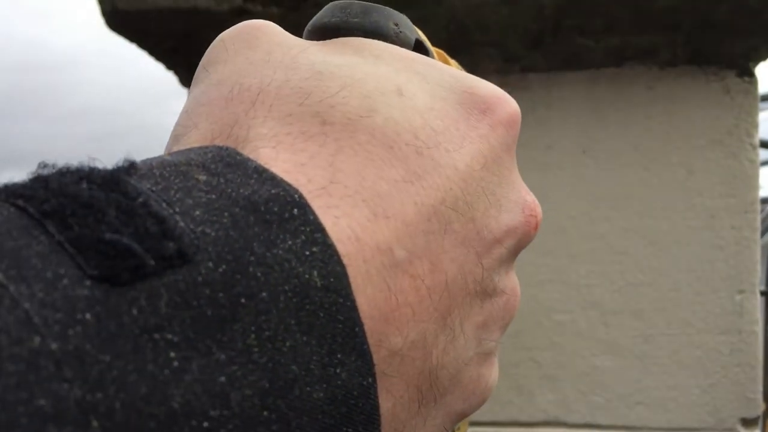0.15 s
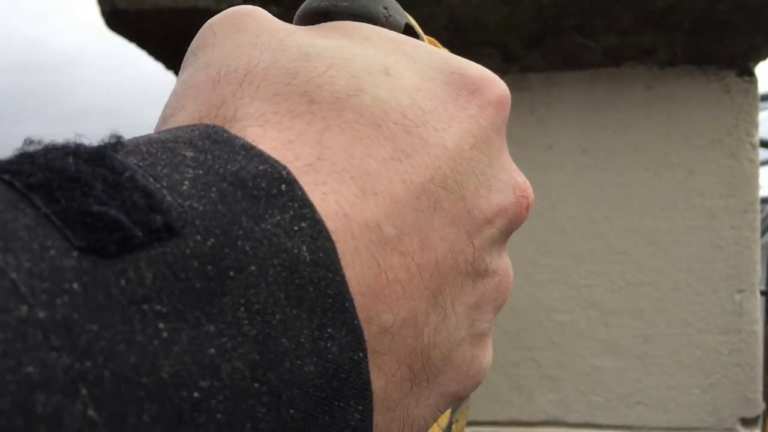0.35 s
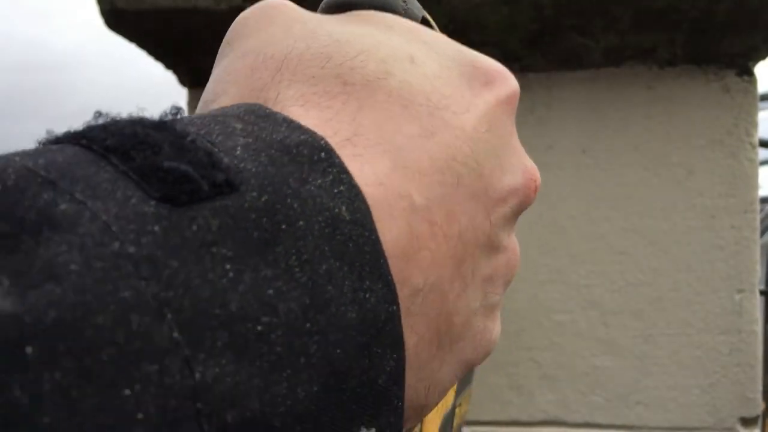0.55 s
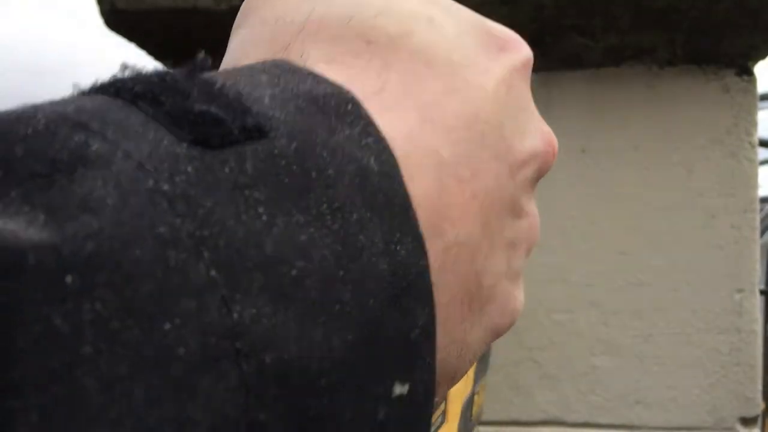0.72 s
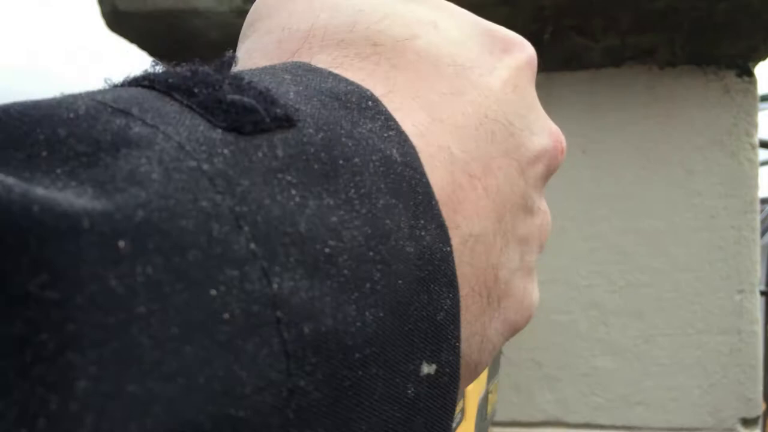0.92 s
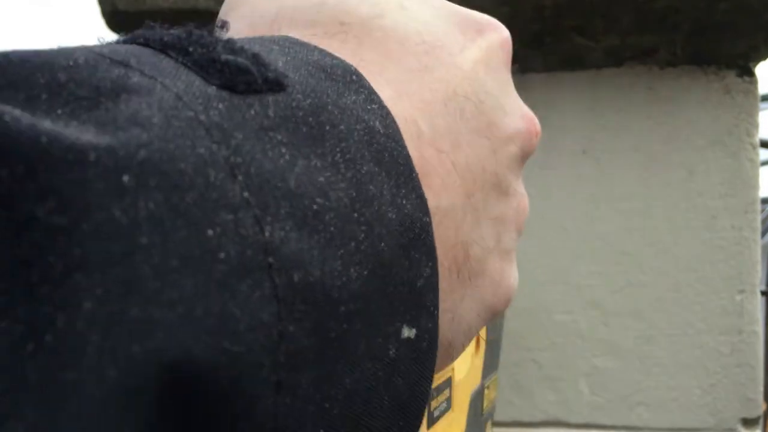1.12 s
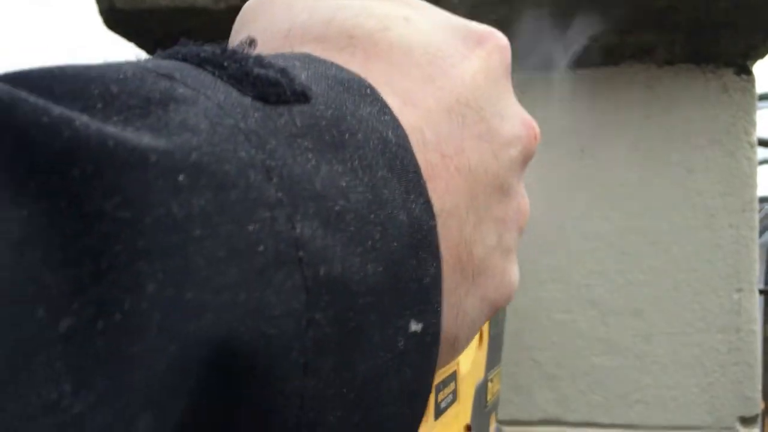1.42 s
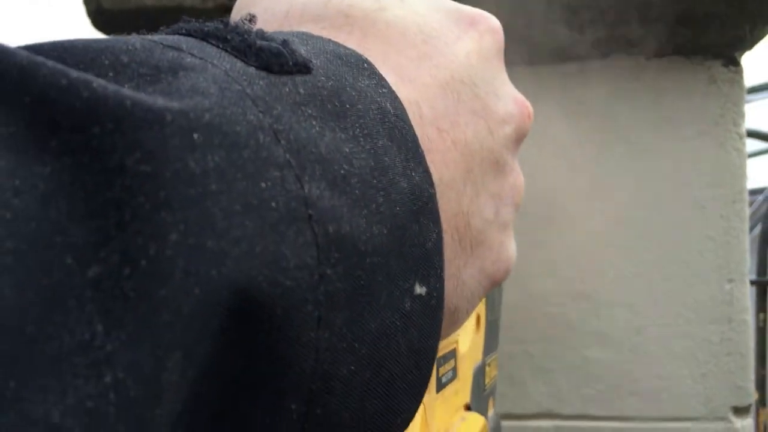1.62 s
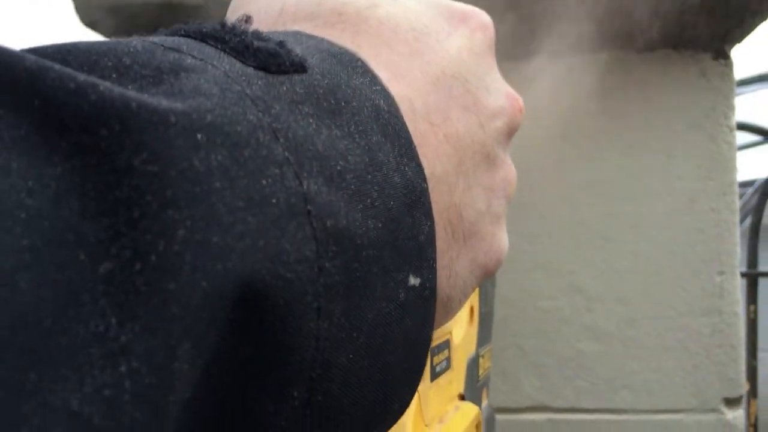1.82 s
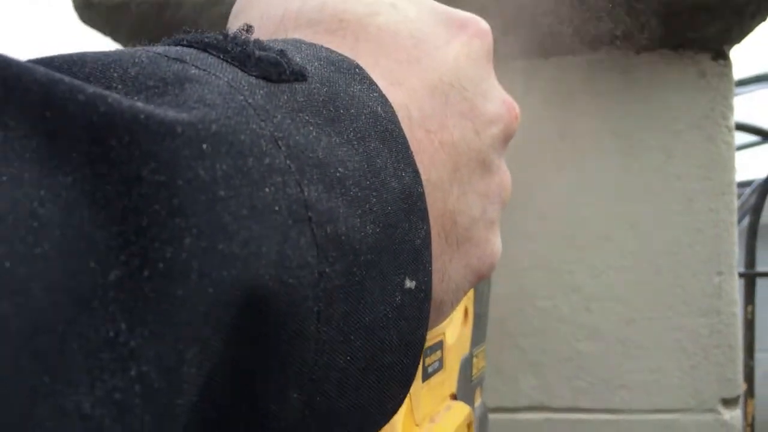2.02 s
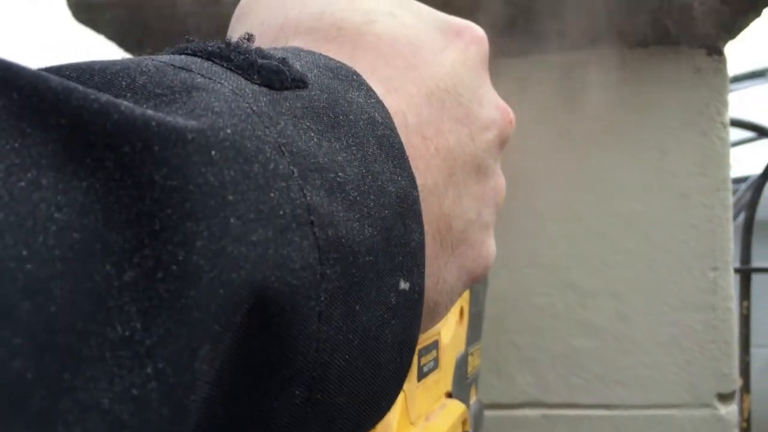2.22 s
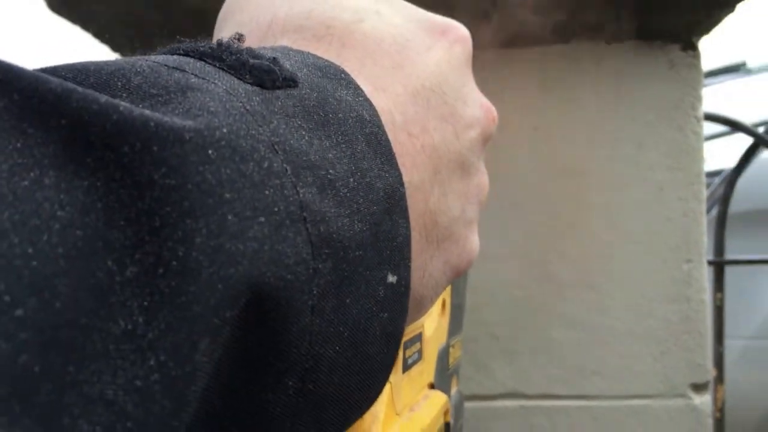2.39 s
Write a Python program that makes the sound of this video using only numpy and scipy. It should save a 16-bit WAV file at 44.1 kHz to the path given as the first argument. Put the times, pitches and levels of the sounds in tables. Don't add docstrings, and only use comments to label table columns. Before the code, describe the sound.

After half a second of faint hum and low wind, a hammer drill spins up and brakes in four brief blips, then drills masonry steadily with a rapid metallic rattle, close and dry outdoors.

```python
import sys
import numpy as np
from scipy import signal
from scipy.fft import rfft, irfft, next_fast_len
from scipy.io import wavfile

SR = 44100
rng = np.random.default_rng(int(sys.argv[2]) if len(sys.argv) > 2 else 0)


def elevation(decibels):
    levels = np.asarray(decibels, float)
    return 10 ** (levels / 20)


def store_wav(level_fs):
    pcm = np.round(np.clip(np.atleast_2d(level_fs), -1, 1) * 32767)
    wavfile.write(sys.argv[1], SR, pcm.T.astype(np.int16))


N = 112454
T = np.arange(N) / SR


def rms_one(x):
    return x / np.sqrt(np.mean(x ** 2) + 1e-20)


def drift(rate_hz):
    r = np.exp(-80 * np.pi * rate_hz / SR)
    slow = signal.lfilter([1], [1, -2 * r, r * r], rng.standard_normal(N // 40 + 1002))[1000:]
    return np.interp(np.arange(N) / 40, np.arange(len(slow)), rms_one(slow))


def coloured(points, patchy_db=0.):
    hz, db = np.transpose(points)
    size = next_fast_len(N)
    f = np.maximum(np.arange(size // 2 + 1) * SR / size, 1)
    spectrum = rfft(rng.standard_normal(size)) * elevation(np.interp(np.log(f), np.log(hz), db))
    spectrum = spectrum * (f > hz[0]) * (f < hz[-1])
    out = 0
    for octave in np.arange(6, 15):
        share = np.cos(np.pi / 2 * np.clip(np.log2(f) - octave, -1, 1)) ** 2
        out = out + irfft(spectrum * share, size)[:N] * elevation(patchy_db * drift(37))
    return rms_one(out)


def resonate(x, hz, width_hz):
    r = np.exp(-np.pi * width_hz / SR)
    poles = [1, -2 * r * np.cos(2 * np.pi * hz / SR), r * r]
    return signal.lfilter([(1 - r * r) / 2, 0, (r * r - 1) / 2], poles, x + 1e-18)


def clicks(s, size):
    at, out = np.clip(s * SR, 0, N - 2), np.zeros(N)
    k = at.astype(int)
    np.add.at(out, k, size * (1 - at + k))
    np.add.at(out, k + 1, size * (at - k))
    return out


def wind():
    # time in seconds, level in dB.
    gust_levels = [(0.0, -47), (0.14, -54), (0.18, -63), (0.82, -56), (0.96, -38), (1.01, -55.5),
                   (1.07, -51.5), (1.17, -61.5), (1.44, -54), (1.52, -43), (1.58, -56.5), (1.92, -57),
                   (1.96, -59.5), (2.34, -51), (2.42, -51), (2.55, -55)]
    s, db = np.transpose(gust_levels)
    low_hz, top_hz = 20.4, 75.6
    low_band = signal.butter(2, [8, low_hz], "band", fs=SR, output="sos")
    top_band = signal.butter(1, [low_hz, top_hz], "band", fs=SR, output="sos")
    low = signal.sosfilt(low_band, rng.standard_normal(N + SR))[SR:]
    top = signal.sosfilt(top_band, rng.standard_normal(N + SR))[SR:]
    top = signal.sosfilt(signal.butter(3, 85, fs=SR, output="sos"), top)
    gusts = rms_one(rms_one(low) + 0.23 * rms_one(top) * elevation(4 * drift(15)))
    level_db = np.interp(T, s, np.minimum(db, -52)) + 3.0

    u, dip_s, swing_s = T - .950, .0045, .024
    dip = 1.15 * np.exp(-(u / dip_s) ** 2)
    swing = .75 * np.exp(-((u - swing_s - dip_s) / swing_s) ** 2)
    return elevation(level_db) * gusts + elevation(-31) * (swing - dip)


def distant_hum():
    # frequency in Hz, level in dB per Hz.
    hum_colour = [(100, -8.5), (200, -14), (780, -25), (1500, -30), (2500, -37.5), (16500, -53)]
    level_db = -84.5 + 3.5 * np.exp(-T / 0.17)
    return elevation(level_db) * coloured(hum_colour, patchy_db=1.5)


def trigger():
    # time in seconds, peak in dB, damping (added to the peak) in dB.
    ticks = [(0.5432, -58.5, -18), (0.5588, -55, -12), (0.5927, -53, -11), (0.731, -63, -5.5),
             (0.7535, -52, -5), (0.8757, -63, -6), (0.894, -66, -11), (1.0195, -60, -4), (1.1721, -61, -8),
             (1.1894, -65, -9)]
    s, db, trim_db = np.transpose(ticks)
    r = np.exp(-1 / (0.0015 * SR))
    gate = signal.lfilter([1], [1, -r], clicks(s, elevation(db + trim_db)))
    return gate * coloured([(1000, 3), (3500, -4), (8000, -1.5), (15500, -17)])


def motor():
    # motor start in seconds, a clear blow in seconds,
    # spin-up before that blow in seconds, letting go in seconds.
    pulls = [
        (.588, .6085, .033, .636),
        (.750, .7715, .029, .809),
        (.895, .9225, .034, .956),
        (1.049, 1.0865, .050, 1.105),
        (1.189, 1.2135, .0285, 9),
    ]
    pull_trim_db = [1.4, 0.2, 0.28, 0.5, 0.25]
    # time in seconds, blow rate in Hz, effort in dB.
    full_speed = [(1.274, 155.0, -45), (1.288, 152.4, -45), (1.414, 151.9, -46), (1.426, 150.4, -45),
                  (1.486, 153.8, -46), (2.086, 153.0, -46), (2.202, 152.2, -46), (2.37, 153.6, -46),
                  (2.516, 153.5, -48), (2.55, 151.2, -47)]
    spin_up_hz_per_s, start_hz, brake_hz_per_s = 1650, 32, 600
    coast_s, coast_db_per_s, stop_db_per_s = 0.034, 75, 1310
    speed_power = 1.576

    s, full_hz, effort_db = np.transpose(full_speed)
    full, phase, level = np.interp(T, s, full_hz), np.zeros(N), np.full(N, -160.)
    ends = [p[0] for p in pulls[1:]] + [9]
    for (start, first, lead, off), end, trim_db in zip(pulls, ends, pull_trim_db):
        after = np.maximum(T - off, 0)
        up = np.maximum(spin_up_hz_per_s * (np.minimum(T, off) - first + lead), start_hz)
        rate = np.maximum(np.minimum(up, full) - brake_hz_per_s * after, 10)
        turns = np.cumsum(rate) / SR
        on = (T >= start) & (T < end)
        phase[on] = (turns - turns[int(first * SR)])[on]
        fade = coast_db_per_s * after + stop_db_per_s * np.maximum(after - coast_s, 0)
        level[on] = (trim_db + 20 * speed_power * np.log10(rate / full) - fade)[on]
    return phase, level + np.interp(T, s, effort_db)


def body_ring(s, back, luck, bite):
    # frequency in Hz, width in Hz, level biting in dB, level running free in dB.
    resonances = [(1400, 220, -3, -1.5), (1660, 178, 0, -14), (1885, 274, -1.5, -28), (2420, 420, -12, -45),
                  (3840, 530, -15.5, -8), (6140, 290, -11, -11), (189, 80, -40, -1.5),
                  (622, 240, -28, -9.5)]
    body = 0
    for k, (hz, width_hz, db, free_db) in enumerate(resonances):
        blows = clicks(s, elevation(1.56 * luck[:, 2 + k]))
        rebounds = clicks(back, elevation(-13) * (luck[:-1, 10 + k] - .7))
        ring = resonate(resonate(blows + rebounds, hz, width_hz), hz, 2 * width_hz)
        body = body + (-1) ** k * elevation(db * bite + free_db * (1 - bite)) * ring
    return body / np.std(body[N // 2:]) * elevation(-2)


def treble_crack(s, back, luck, bite):
    # frequency in Hz, level in dB per Hz.
    crack_colour = [(2000, -13), (3000, -2), (4000, -4), (6200, 0.5), (9000, -3), (10000, -9.5),
                    (13500, -6), (16500, -12.5)]
    bite_s, free_s = .00048, .0003
    spread_db = 2.3
    late_s = 0.00085 * np.interp(s, T, bite)
    blows = clicks(s + late_s, elevation(spread_db * luck[:, 18]))
    rebounds = clicks(back, np.interp(back, T, bite) * elevation(-13 + spread_db * luck[:-1, 19]))
    hits = blows + rebounds
    r, q = np.exp(-1 / (bite_s * SR)), np.exp(-1 / (free_s * SR))
    gate = signal.lfilter([1], [1, -2 * r, r * r], bite * hits)
    gate += signal.lfilter([bite_s / free_s], [1, -2 * q, q * q], (1 - bite) * hits)
    gate = gate / np.sqrt(np.mean(gate[N // 2:] ** 2))
    return elevation(-6.5 + 4.5 * (1 - bite)) * coloured(crack_colour) * gate


def grinding_grit(bite):
    # frequency in Hz, level in dB per Hz.
    grit_colour = [(100, -13.5), (1100, -9.5), (1350, -1), (1900, -2), (2900, -10), (9200, -15.5),
                   (10200, -21.5), (16500, -21)]
    grit = elevation(-5 - 0.5 * bite) * coloured(grit_colour, patchy_db=1.6)
    less_ring = grit - 0.42 * resonate(grit, 2280, 950)
    free = signal.lfilter(*signal.butter(2, 9350, fs=SR), less_ring)
    return bite * grit + (1 - bite) * free


def casing_shake(phase, bite):
    # multiple of the blow rate, level in dB.
    tones = [(1, -12.5), (2, -22.5), (3, -24), (4, -15), (5, -13.5), (6, -17.5), (8, -19)]
    shake = 0
    for k, db in tones:
        free_boost_db = 6.4 * (1 - bite) * (k < 3)
        level_db = db + 3 + free_boost_db + 2.5 * drift(13.6)
        shake = shake + elevation(level_db) * np.sin(2 * np.pi * (k * phase + rng.random()))
    return elevation(-4 * (1.5 - bite)) * shake


def drill():
    phase, level = motor()
    bite = 1 / (1 + np.exp(-np.clip((T - 1.262) / 0.0027, -50, 50)))
    s = T[1:][np.diff(np.floor(phase)) == 1]
    luck = rng.standard_normal((400, 20))[:len(s)]
    s = s + .00003 * luck[:, 0]
    back = s[:-1] + np.minimum(np.diff(s), .02) * (0.522 + 0.058 * luck[:-1, 1])
    blows = body_ring(s, back, luck, bite) + treble_crack(s, back, luck, bite)
    return elevation(level) * (blows + grinding_grit(bite) + casing_shake(phase, bite))


def wall_slap(tool):
    late = np.concatenate([np.zeros(530), tool])[:N]
    return elevation(-30) * signal.lfilter([.3], [1, -.7], late)


def scene():
    tool = trigger() + drill()
    return (wind() + distant_hum() + tool + wall_slap(tool))[None]


def band_limit(x):
    return signal.sosfilt(signal.butter(12, 15840, fs=SR, output="sos"), x)


def record(dry):
    steep_cut = signal.ellip(12, .5, 60, 15800, fs=SR, output="sos")
    mix = signal.sosfilt(steep_cut, dry)
    return band_limit(mix)


dry = scene()
out = record(dry)
store_wav(out)
```